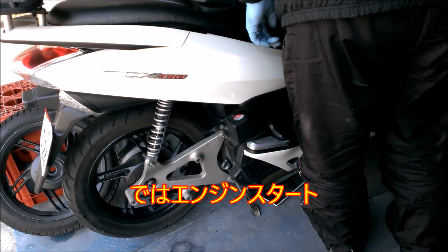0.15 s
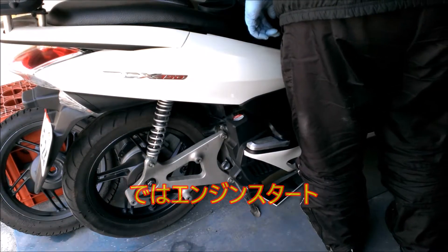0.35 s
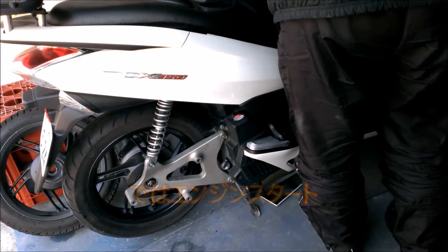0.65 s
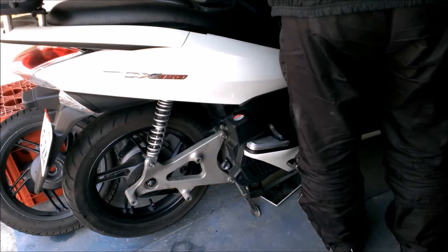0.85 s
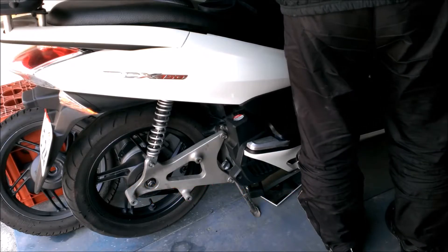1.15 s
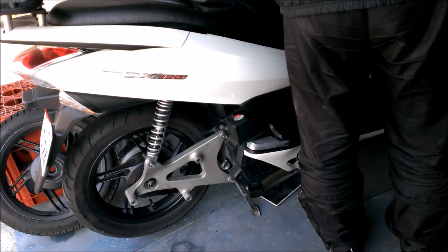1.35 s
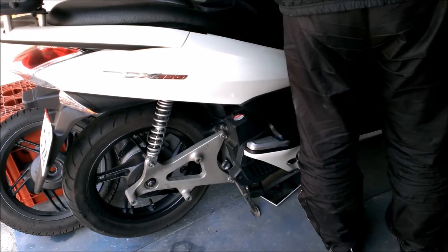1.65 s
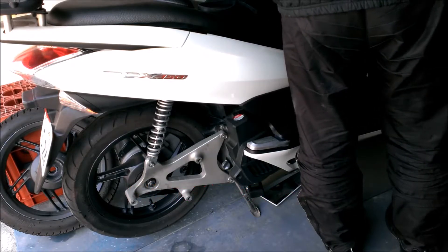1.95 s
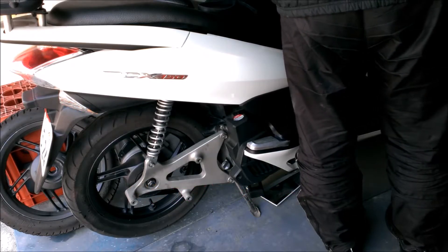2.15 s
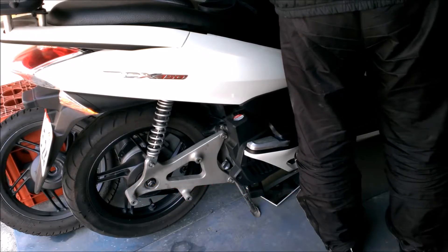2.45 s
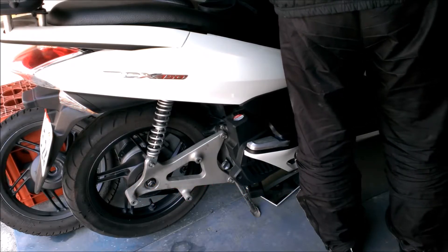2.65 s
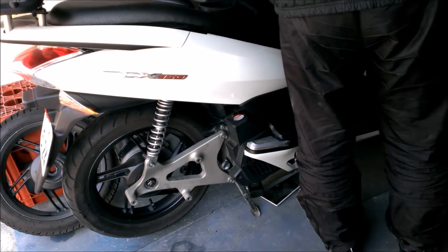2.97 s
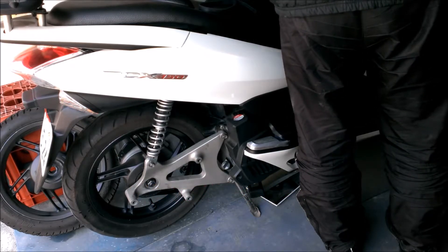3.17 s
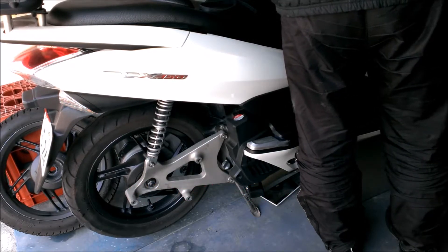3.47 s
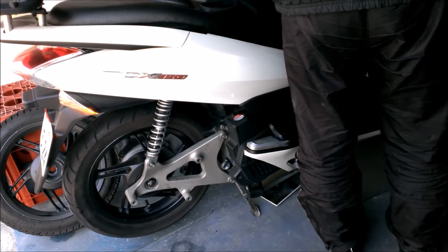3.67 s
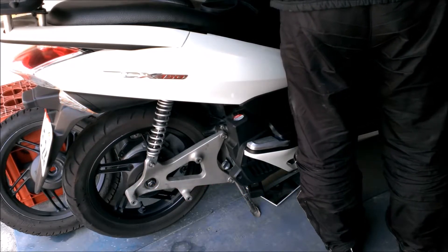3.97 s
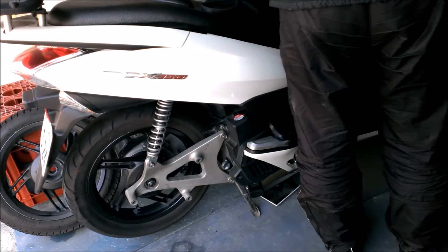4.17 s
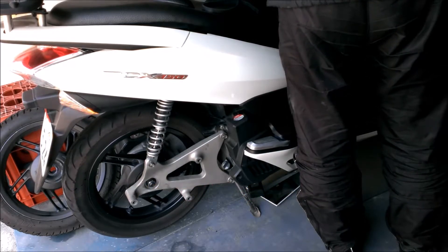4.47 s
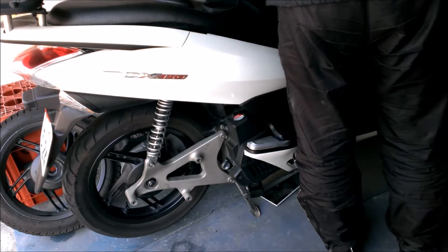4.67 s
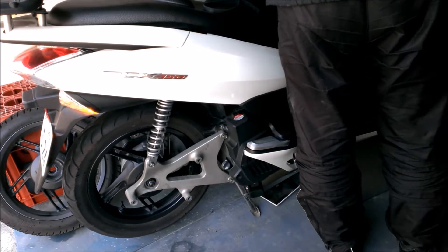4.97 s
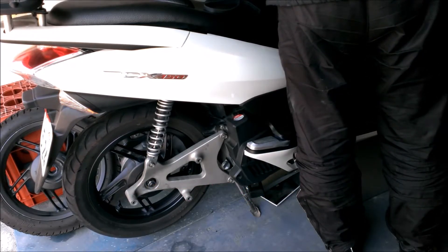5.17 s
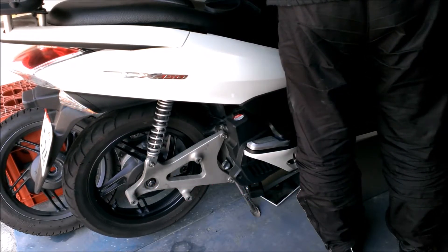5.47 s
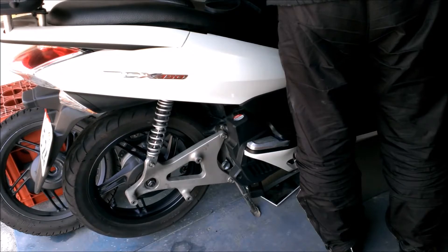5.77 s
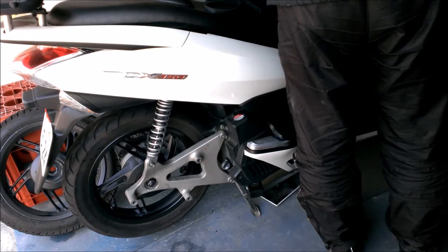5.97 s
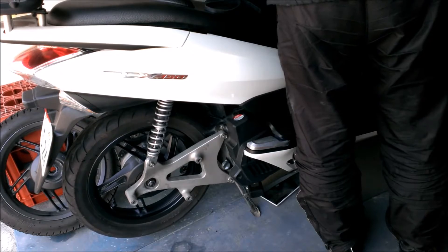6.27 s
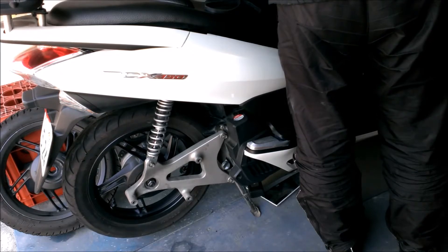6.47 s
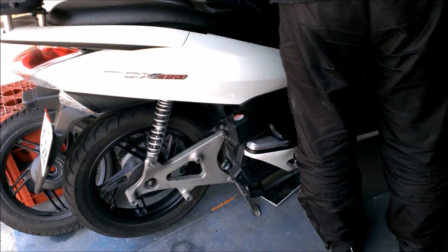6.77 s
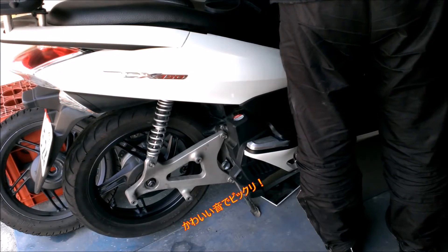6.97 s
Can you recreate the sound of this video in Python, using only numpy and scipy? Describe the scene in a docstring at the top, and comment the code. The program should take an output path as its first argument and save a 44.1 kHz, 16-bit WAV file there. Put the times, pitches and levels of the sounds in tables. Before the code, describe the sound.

A key clicks in a scooter's lock, then the unmuffled engine starts, pops loudly and rapidly for a few seconds, and stops.

```python
"""A key clicks and scrapes into a scooter's lock, close by in a workshop. The fuel pump whirrs, the
starter cranks, and with the muffler off the single cylinder barks from its open port about 17 times
a second, each firing a pressure pulse and a jet of gas. Switched off, it coasts to rest over a low hum.
The two close microphones are opposite in polarity and differ in their treble."""
import sys
import numpy as np
from scipy import signal
from scipy.fft import rfft, irfft, next_fast_len
from scipy.io import wavfile
from scipy.ndimage import map_coordinates

SR = 44100
rng = np.random.default_rng(int(sys.argv[2]) if len(sys.argv) > 2 else 0)


def unload_wav(signal):
    """Save mono or channel-first audio to the path in sys.argv[1] as 16-bit WAV at rate SR, clipped to [-1, 1]."""
    wavfile.write(
        sys.argv[1],
        SR,
        np.round(np.clip(np.atleast_2d(signal).T, -1, 1) * 32767).astype(np.int16),
    )


N = 313992

BLAST_DB, BLAST_DB_PER_HZ = 0.4, 0.4  # bark at the mean speed; gain per extra firing a second
RASP_DB, RASP_GROWS = -19, 0.7  # level at a normal charge; dB per dB of charge
CRACK_DB, CRACK_GROWS, CRACK_SCATTER_DB = -13, 1.26, 1.82
BLOW_S, BLOW_GROWS = 0.012, 0.55  # a fuller cylinder blows for longer
WHISTLE_HZ, WHISTLE_HZ_PER_DB, WHISTLE_SCATTER_HZ = 5030, 39.5, 258.3
# The gas jet's rasp, close up. Each row: frequency in Hz, spectral level in dB.
RASP_SPECTRUM = [(300, -1.5), (1200, -5), (1900, -6), (2600, -9), (3900, -6), (4900, 1.5), (5700, 0.5),
                 (7000, -3.5), (10500, -16)]
# The jet's opening crack. Each row: frequency in Hz, spectral level in dB.
CRACK_SPECTRUM = [(1000, -34), (3000, -24.5), (6500, -21.5), (7600, -1.5), (8500, 8), (9000, 1.5),
                  (9600, 11), (10400, 0.5), (11000, -21.5)]
# Resonances of the exhaust port and cylinder head. Each row: frequency in Hz, width in Hz, lift in dB.
PORT_MODES = [(1933, 110, 5), (3047, 97, 7), (4910, 80, 1.5), (5200, 43, -4), (5710, 210, 3), (7180, 37, 1),
              (8710, 97, 2), (9390, 270, 0), (9870, 61, 1.5)]
def exhaust():
    """Each firing sends out a blast and a jet, whose crack and longer whistling rasp follow the charge."""
    times, speed, charge_db = firings()
    crack_luck, pitch_luck = rng.standard_normal((len(times), 2)).T
    bark = np.zeros((2, N))
    for s, db in zip(times, BLAST_DB + BLAST_DB_PER_HZ * (speed - speed.mean())):
        add(bark, s, amp(db) * blast(cut_hz=3500, scatter_db=1.5, detune=0.008, wet_db=-15))
    pitch = WHISTLE_HZ + WHISTLE_HZ_PER_DB * charge_db + WHISTLE_SCATTER_HZ * pitch_luck
    blow_s = BLOW_S * amp(BLOW_GROWS * charge_db)
    rasp = noise(RASP_SPECTRUM) + amp(-9) * whistles(times, pitch, width_hz=120)
    rasp *= bursts(times, RASP_DB + RASP_GROWS * charge_db, rise=0.0022, hold=blow_s, t60=0.047)
    crack_db = CRACK_DB + CRACK_GROWS * charge_db + CRACK_SCATTER_DB * crack_luck
    crack = noise(CRACK_SPECTRUM) * bursts(times, crack_db, rise=0.0006, hold=0.0055, t60=0.032)
    eddies = amp(1.4 * wobble(450))  # the jet tears as it leaves
    jet = in_shop(rasp * eddies, wet_db=-1.5, build=0.001)
    jet += in_shop(crack * eddies, wet_db=-5.5, build=0.0053)
    return bark + recoloured(resonate(jet, PORT_MODES), times, depth_db=3, width_hz=450.6)


LOPE_DB, SETTLED_S, SETTLE_S = 2.5, 3.7, 0.2  # weak and strong firings alternate: depth, end, fade
CHARGE_SCATTER_DB = 1.5
# Engine speed from first firing to switch-off. Each row: time in seconds, firings per second.
ENGINE_SPEED = [(2.95, 11.54), (3.05, 13.486), (3.241, 15.245), (3.591, 16.565), (4.105, 17.084),
                (4.864, 16.257), (4.921, 16.839), (5.5, 16.564)]
# How full the cylinder burns as the idle hunts. Each row: time in seconds, charge in dB.
CYLINDER_CHARGE = [(2.95, 3), (3.25, .5), (3.6, -0.15), (4.5, -0.2), (4.7, 4), (4.82, -2.1), (5.0, -3),
                   (5.3, 0.44), (5.47, 3.5)]
def firings():
    """One firing each time the crank completes a cycle: its time, the speed and the charge in dB."""
    t = np.arange(ENGINE_SPEED[0][0], ENGINE_SPEED[-1][0], 1 / SR)
    speed = np.interp(t, *np.transpose(ENGINE_SPEED))
    cycles = np.cumsum(speed) / SR
    count = np.arange(int(cycles[-1]) + 1)
    times = np.interp(count, cycles, t)
    lope = -LOPE_DB * np.cos(np.pi * count) * np.clip((SETTLED_S - times) / SETTLE_S, 0, 1)
    scatter = CHARGE_SCATTER_DB * rng.standard_normal(len(count))
    charge_db = np.interp(times, *np.transpose(CYLINDER_CHARGE)) + lope + scatter
    return times, np.interp(times, t, speed), charge_db


# Resonances of the port and the space around it. Each row: frequency in Hz, arrival in seconds,
# swell in seconds, level in dB, left over right in dB.
BLAST_MODES = [(90.4, 0.0109, 0.017, -20, -4.5), (175, 0.0013, 0.012, -17, -1.5),
               (239, 0.0035, 0.0031, -12.5, 0), (271.1, 0.0031, 0.0078, -20.5, 7.5),
               (359.5, 0.00022, 0.0063, -14, -2.5), (442, 0.0037, 0.0036, -15.5, 4),
               (543, 0.0034, 0.012, -19.5, 1), (604, 0.0131, 0.0089, -20.5, 13),
               (710, 0.0131, 0.0041, -9.5, 3.5), (844, 0.018, 0.0049, -18, -4.5),
               (948.6, 0.024, 0.0073, -18, 1.5), (1065, 0.01815, 0.0025, -11, 5),
               (1290, 0.0053, 0.025, -37, 13.5), (1515, 0.0043, 0.0036, -28, 7),
               (1750, 0.0003, 0.0013, -28, 3.5)]
# Phase between the microphones, polarity aside. Each row: frequency in Hz, the left's lead in radians.
LEFT_LEAD = [(85, 1.05), (175, 0.89), (260, 0.55), (365, 0.31), (700, 0.0027), (950, 0.86), (1100, 0.38),
             (1900, 0.19)]
def blast(cut_hz, scatter_db, detune, wet_db, life=0.045):
    """One pressure pulse: low resonances speak at once, middle ones as it returns from floor and walls."""
    t = np.arange(SR // 5) / SR
    hz, arrival, swell, db, lean_db = np.transpose(BLAST_MODES)[:, :, None]
    age = np.maximum(t - arrival, 0)
    size = amp(db + scatter_db * rng.standard_normal(hz.shape)) / np.sqrt(1 + (hz / cut_hz) ** 8)
    envelope = size * age / swell * np.exp(1 - age / swell - (t / life) ** 6)  # returns end together
    shifted_hz = hz * (1 + detune * rng.standard_normal(hz.shape))  # hot gas shifts the pitches
    phase = 2 * np.pi * shifted_hz * age
    left = envelope * amp(lean_db / 2) * np.sin(phase)
    right = -envelope * amp(-lean_db / 2) * np.sin(phase - along(LEFT_LEAD, hz))
    return in_shop(np.array([left.sum(0), right.sum(0)]), wet_db, build=0.017)


def whistles(times, pitch, width_hz):
    """The jet sings in a narrow band, repitched at each firing and louder on the right; rms 1."""
    hz = pitch[np.maximum(np.searchsorted(times, np.arange(N) / SR) - 1, 0)]
    flutter = filtered(rng.standard_normal((2, 2, N)), lambda f: 1 / (1 + (f / width_hz) ** 2))
    phase = 2 * np.pi * np.cumsum(hz) / SR
    return unit((flutter[0] * np.sin(phase) + flutter[1] * np.cos(phase)) * amp([[-8], [0]]))


# Strokes while cranking and coasting; a slower crank has a longer swell. Each row: start in seconds,
# blast in dB, hiss in dB, ring pitch in Hz, ring level in dB, swell in seconds.
WEAK_STROKES = [(2.635, -27, -26.5, 225, -33.5, 0.01), (2.808, -30, -58, 245, -33, 0.0095),
                (2.913, -22, -24, 1113, -15, 0.0066), (5.539, -2, -17, 183, -31, .009),
                (5.619, -3, -18.5, 186, -26, 0.011), (5.753, -17, -31, 254, -20, .013)]
def puffs(rough=0.4):
    """Weak strokes: a dull blast, one rough ringing resonance and a hiss past the valve."""
    times, _, hiss_db, *_ = np.transpose(WEAK_STROKES)
    t, thumps = np.arange(SR // 4) / SR, np.zeros((2, N))
    for s, db, _, hz, ring_db, swell in WEAK_STROKES:
        jitter = map_coordinates(rng.standard_normal(128), [t * hz / 4], mode="mirror")
        phase = 2 * np.pi * hz * t + rough * jitter
        tone = np.array([np.sin(phase), -0.65 * np.sin(phase - along(LEFT_LEAD, hz))])
        ring = t / swell * np.exp(1 - t / swell) * tone
        add(thumps, s, amp(db) * blast(cut_hz=380, scatter_db=1, detune=0.01, wet_db=-16))
        add(thumps, s, in_shop(amp(ring_db) * ring, wet_db=-19.5, build=0.02))
    hiss = noise(CRACK_SPECTRUM) + amp(-8) * noise(RASP_SPECTRUM)
    hiss *= bursts(times, hiss_db, rise=0.00203, hold=0.0082, t60=0.077)
    return thumps + in_shop(hiss, wet_db=-12, build=0.0042)


# Valve gear and belt, running and coasting. Each row: time in seconds, level in dB.
RATTLE_LEVEL = [(2.9, -40), (3.0, -34.5), (5.5, -30.5), (5.6, -35.5), (5.93, -51), (5.98, -67), (6.1, -98)]
# Their rattle, close up. Each row: frequency in Hz, spectral level in dB.
RATTLE_SPECTRUM = [(88, -27.5), (150, -3), (313, -5.5), (1140, -19), (1520, -12.5), (1760, -20.5),
                   (5460, -13.5), (9700, -45), (10400, -31), (11000, -52), (14300, -82.5), (22000, -120)]
# Resonances of the engine case. Each row: frequency in Hz, width in Hz, lift in dB.
CASE_MODES = [(1540, 59.4, 7.5), (2223, 110, 13), (4883, 200, -5.5)]
def valve_gear():
    """Valve gear and belt rattle in the engine case until the crank stops."""
    rattle = unit(resonate(noise(RATTLE_SPECTRUM), CASE_MODES))
    return level(RATTLE_LEVEL) * rattle * amp(2.2 * wobble(120))


# The starter cranking. Each row: time in seconds, level in dB.
STARTER_LEVEL = [(2.48, -57.5), (2.554, -44.5), (2.674, -40.5), (2.726, -45.5), (2.95, -38)]
# The grind of its gears. Each row: frequency in Hz, spectral level in dB.
STARTER_SPECTRUM = [(88, -40), (150, -6.5), (248, -14), (325, -20), (972, -16.5), (1080, -11.5),
                    (2520, -12.5), (3070, -15), (5460, -9.5), (7020, -16.5), (9530, -9), (10400, -20.5),
                    (11000, -44), (14300, -69), (22000, -120)]
# Resonances of its housing. Each row: frequency in Hz, width in Hz, lift in dB.
STARTER_MODES = [(1108, 120, 2), (3230, 230, 7), (4820, 90, 0.5), (5400, 180, 4.5), (7450, 68, 5)]
def starter():
    """The starter's gear teeth grind unevenly inside their housing."""
    teeth = amp(1.3 * wobble(140))
    return level(STARTER_LEVEL) * unit(resonate(noise(STARTER_SPECTRUM), STARTER_MODES)) * teeth


# Key and switches, near the microphones. Each row: start in seconds, knock in dB, tick in dB.
KEY_CLICKS = [(0.012, -48, -56), (0.135, -44, -42), (0.382, -54, -44), (0.408, -56, -37),
              (0.515, -54, -49.5), (0.889, -32.5, -33.5), (0.918, -39, -52), (0.99, -46.5, -50),
              (1.195, -45, -52), (1.972, -66, -54.5), (2.062, -74, -56.5), (2.125, -74, -59.5),
              (2.323, -65, -60.5), (2.491, -50, -54), (6.798, -56, -56)]
# The key scraping in the lock. Each row: start in seconds, length in seconds, level in dB.
KEY_SCRAPES = [(0.302, .07, -62.5), (0.528, 0.036, -56), (0.724, 0.16, -57.5)]
# Hollow clunks of the plastic body. Each row: start in seconds, level in dB.
BODY_CLUNKS = [(0.798, -47), (.89, -40), (1.196, -44), (6.799, -53)]
# A knock on plastic. Each row: frequency in Hz, spectral level in dB.
KNOCK_SPECTRUM = [(150, -24), (350, -16), (550, -4), (850, -9), (1150, -1), (1500, 0), (2000, -0.5),
                  (2700, 0), (4000, -2.5), (7000, -12)]
# Metal ticking or scraping. Each row: frequency in Hz, spectral level in dB.
METAL_SPECTRUM = [(1500, -8.5), (2500, -10), (3200, -8), (3900, -12.5), (5100, 2.5), (6500, -6), (8400, 0),
                  (9700, 4), (10600, -12.5)]
# A hollow body panel. Each row: frequency in Hz, spectral level in dB.
PANEL_SPECTRUM = [(250, -26), (500, -6), (750, -5), (1200, -3), (1500, -4), (1850, 1.5), (2300, -12),
                  (4000, -18), (8000, -40)]
def key_and_switches():
    """Plastic knocks and metal ticks, with soft scrapes and hollow clunks, ring on in the workshop."""
    times, knock_db, tick_db = np.transpose(KEY_CLICKS)
    starts, lengths, scrape_db = np.transpose(KEY_SCRAPES)
    knocks = bursts(times, knock_db, rise=0.0014, hold=0.0055, t60=0.11) * noise(KNOCK_SPECTRUM)
    ticks = bursts(times, tick_db, rise=0.0011, hold=0.013, t60=0.085) * noise(METAL_SPECTRUM)
    scrapes = bursts(starts, scrape_db, rise=0.01, hold=lengths, t60=0.11) * noise(METAL_SPECTRUM)
    clunks = bursts(*np.transpose(BODY_CLUNKS), rise=0.0018, hold=0.0034, t60=0.061)
    clunks = clunks * noise(PANEL_SPECTRUM)
    return in_shop(knocks + ticks + scrapes + clunks, wet_db=-2.5, build=0.0049)


KEY_ON_S, TONE_FADE_S = 0.9, 0.092
# The fuel pump's whirr, faint even close up. Each row: time in seconds, level in dB.
WHIRR_LEVEL = [(0.9, -63.5), (0.96, -46.5), (1.1, -49.5), (1.25, -53.5), (1.7, -58), (1.8, -73), (2.3, -85)]
# The colour of that whirr. Each row: frequency in Hz, spectral level in dB.
WHIRR_SPECTRUM = [(300, -24.5), (550, -5), (800, -15.5), (1200, -25), (2200, -6), (3500, -7.5),
                  (5200, -0.5), (6800, -9), (8400, 0.5), (10400, -4.5)]
# Faint key-on tones of the fuel pump, idle valve and ignition electronics, at the left microphone.
# Each row: frequency in Hz, level in dB, end in seconds.
KEY_ON_TONES = [(500, -68.5, 2.53), (1155, -65, 2.17), (2050, -69, 2.7), (8210, -71, 2.4)]
def key_on():
    """The fuel pump primes with a soft whirr; pump, idle valve and ignition electronics sing faintly."""
    t, tones = np.arange(N) / SR, np.zeros(N)
    wavering_time = np.cumsum(1 + 0.00342 * wobble(13)) / SR
    for hz, db, until in KEY_ON_TONES:
        running = np.clip(np.minimum(t - KEY_ON_S, until - t) / TONE_FADE_S, 0, 1)
        tones += running * amp(db + 3.2 * wobble(18)) * np.sin(2 * np.pi * hz * wavering_time)
    return noise(WHIRR_SPECTRUM) * level(WHIRR_LEVEL) + tones * np.array([[1], [-0.27]])


# The workshop's room tone. Each row: frequency in Hz, spectral level in dB.
ROOM_TONE = [(15, -77), (25, -41), (69, -17.5), (101, -4), (197, -13.5), (218, -15), (281, -14), (381, -20),
             (422, -20.5), (668, -21), (740, -24.5), (1200, -25), (5120, -29), (9930, -40.5), (11000, -53),
             (14300, -87), (22000, -120)]
def workshop():
    """Quiet air with the steady hum of a fan or compressor."""
    hum_hz = 101 + 2.2 * wobble(6.4)
    hum = np.sin(2 * np.pi * np.cumsum(hum_hz) / SR) * amp(wobble(3.6))
    return amp(-58.5) * noise(ROOM_TONE) + amp(-59.5) * hum * np.array([[-0.4], [1.3]])


# The workshop's reverberation. Each row: frequency in Hz, seconds to fall by 60 dB.
SHOP_T60 = [(100, 0.23), (600, 0.27), (3000, 0.2), (10000, 0.19)]
def in_shop(x, wet_db, build):
    """A sound plus the workshop's diffuse answer, which swells over `build` seconds as the walls reply."""
    hz, t, spectra = signal.stft(rng.standard_normal((2, SR // 2)), SR, nperseg=256)
    envelope = amp(-60 * t / along(SHOP_T60, hz)[:, None]) * (1 - np.exp(-(t / build) ** 2))
    tail = signal.istft(spectra * envelope, SR, nperseg=256)[1]
    wet = signal.fftconvolve(x, tail / np.linalg.norm(tail[0]), axes=1)
    return x + amp(wet_db) * wet[:, :x.shape[1]]


# How alike the two microphones hear. Each row: frequency in Hz, left-right correlation.
MIC_LIKENESS = [(60, -0.034), (270, -0.61), (600, -0.375), (1200, -0.23), (2500, -0.24), (5000, -0.155),
                (11000, -0.13)]
# Their balance. Each row: frequency in Hz, left over right in dB.
MIC_BALANCE = [(60, -4), (110, 2.5), (340, 2), (1100, 3), (2000, 2.5), (3200, 0.5), (4000, -3.5),
               (4900, -10), (5900, -3), (7000, 3.5), (8500, 15), (9700, 20.5), (10500, 20.5)]
def noise(spectrum):
    """Coloured noise of rms 1 as the two microphones hear it."""
    def mid_side(hz):
        turn = np.arccos(np.clip(along(MIC_LIKENESS, hz), -1, 1)) / 2
        return amp(along(spectrum, hz)) * [np.cos(turn), np.sin(turn)]

    def left_right(hz):
        pan = np.arctan(amp(along(MIC_BALANCE, hz)))
        return np.array([np.sin(pan), np.cos(pan)])

    mid, side = filtered(rng.standard_normal((2, N)), mid_side)
    return unit(filtered(np.array([mid + side, mid - side]), left_right))


def resonate(x, modes):
    """x through a body's resonances, each a bump of (Hz, width in Hz, dB)."""
    return filtered(x, lambda f: amp(sum(db / (1 + (2 * (f - hz) / bw) ** 2) for hz, bw, db in modes)))


def recoloured(x, times, depth_db, width_hz):
    """Each event, from its time until the next, gets random humps in its spectrum."""
    hz, t, spectra = signal.stft(x, SR, nperseg=512)
    knots = rng.standard_normal((len(times) + 1, 128))
    humps = np.array([map_coordinates(row, [hz / width_hz], mode="mirror") for row in knots])
    gain = amp(depth_db * humps[np.searchsorted(times, t + 0.004)].T)
    return signal.istft(spectra * unit(gain), SR, nperseg=512)[1][:, :N]


def bursts(times, sizes_db, rise, hold, t60):
    """Envelope of bursts that rise, hold and die (all in seconds); their powers add."""
    t, power = np.arange(SR // 2) / SR, np.zeros(N)
    for s, db, held in np.broadcast(times, sizes_db, hold):
        shape = (1 - np.exp(-(t / rise) ** 2)) * amp(db - 60 * np.maximum(t - held, 0) / t60)
        add(power, s, shape ** 2)
    return np.sqrt(power)


def level(rows):
    """Gain per sample from (seconds, dB) rows, silent outside them."""
    return amp(np.interp(np.arange(N) / SR, *np.transpose(rows), left=-120, right=-120))


def wobble(rate):
    """A smooth random curve, rate knots a second."""
    return map_coordinates(rng.standard_normal(int(N * rate / SR) + 4), [np.arange(N) * rate / SR])


def filtered(x, response):
    """x with its spectrum multiplied by response(Hz)."""
    size = next_fast_len(N + SR // 2)
    return irfft(rfft(x, size) * response(np.fft.rfftfreq(size, 1 / SR)), size)[..., :N]


def along(points, hz):
    """Interpolate (Hz, value) points on a log frequency axis."""
    freqs, values = np.transpose(points)
    return np.interp(np.log(hz + 1), np.log(freqs + 1), values)


def add(track, s, x):
    """Mix x into the track at s seconds."""
    part = track[..., max(round(s * SR), 0):][..., :x.shape[-1]]
    part += x[..., :part.shape[-1]]


def amp(db):
    """Decibels to gain."""
    return 10 ** (np.asarray(db) / 20)


def unit(x):
    """Scaled to rms 1."""
    return x / np.sqrt(np.mean(x ** 2) + 1e-20)


def scene():
    """The scooter and the workshop at the two close microphones."""
    return exhaust() + puffs() + key_and_switches() + key_on() + starter() + valve_gear() + workshop()


CEILING, TOP_HZ = 0.76, 10650
def record(dry):
    """The camera rounds off the highest peaks and keeps nothing above its band limit."""
    rounded = dry / (1 + np.abs(dry / CEILING) ** 8) ** (1 / 8)
    return filtered(rounded, lambda hz: 1 / np.sqrt(1 + (hz / TOP_HZ) ** 140))


dry = scene()
out = record(dry)
unload_wav(out)
```